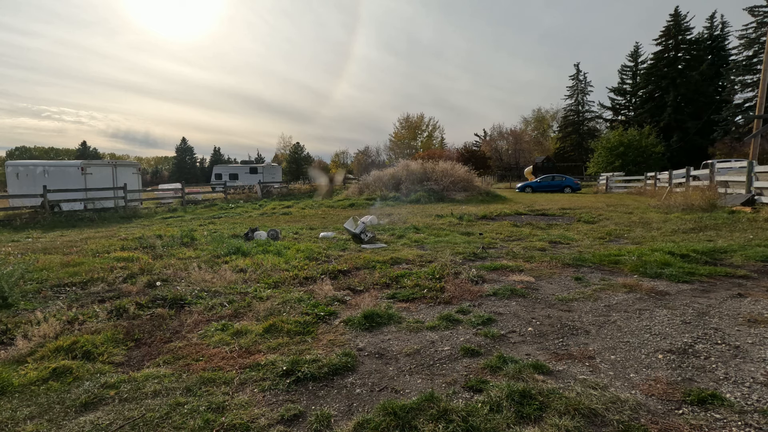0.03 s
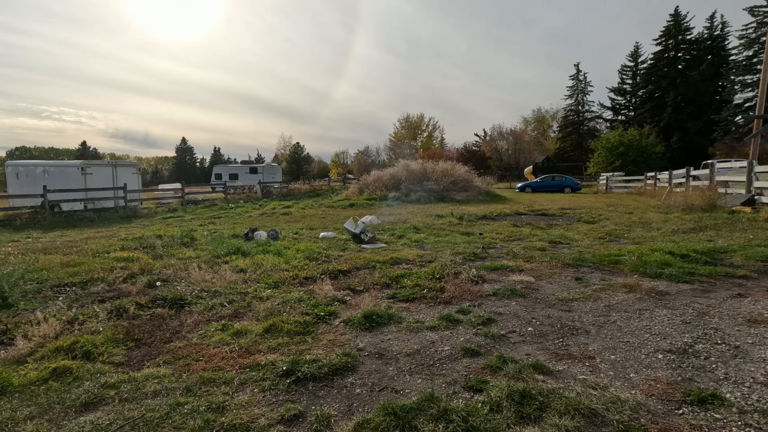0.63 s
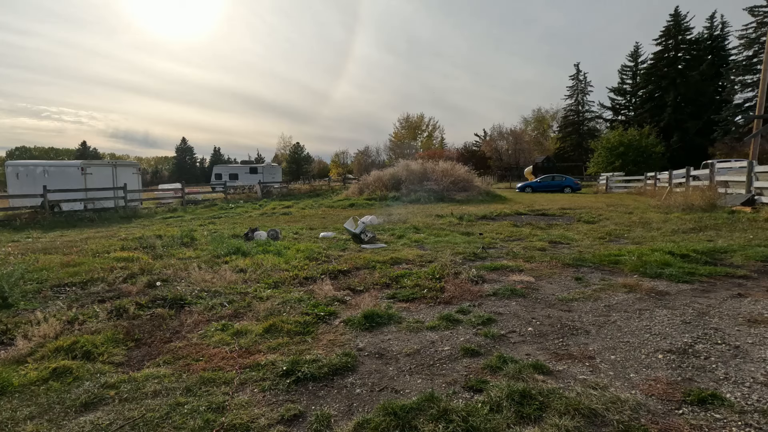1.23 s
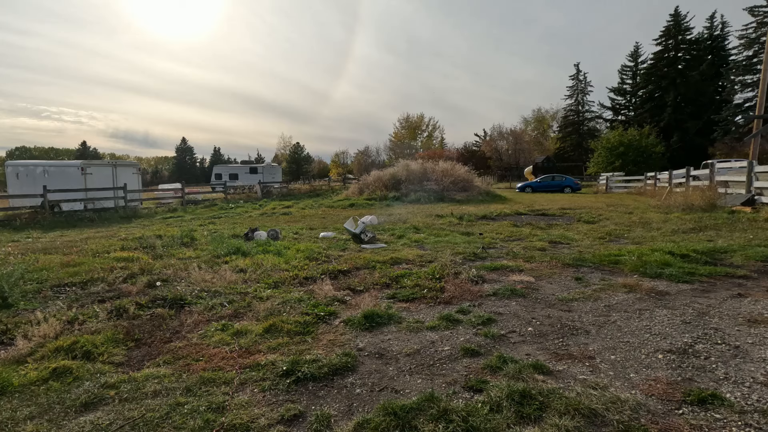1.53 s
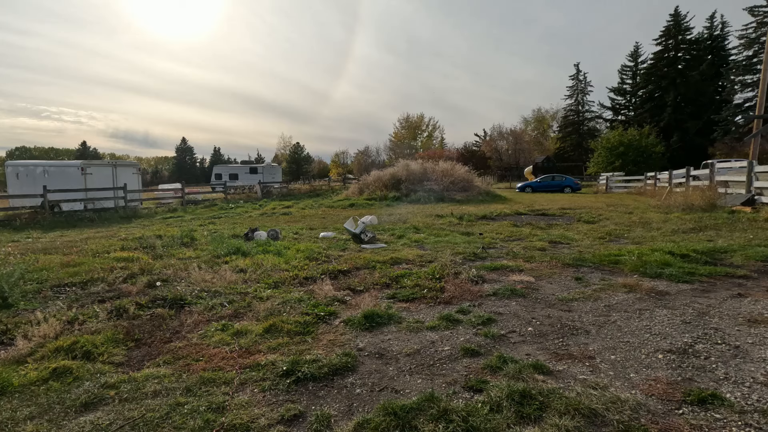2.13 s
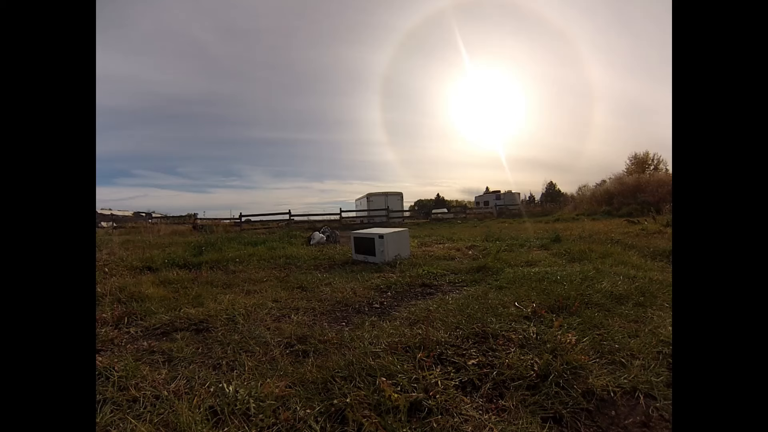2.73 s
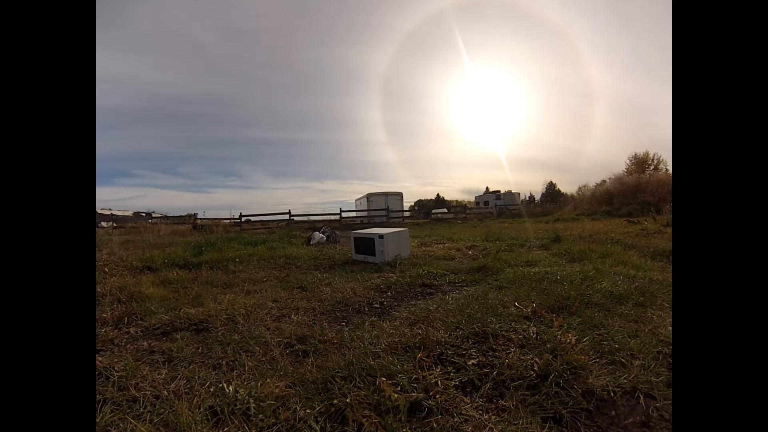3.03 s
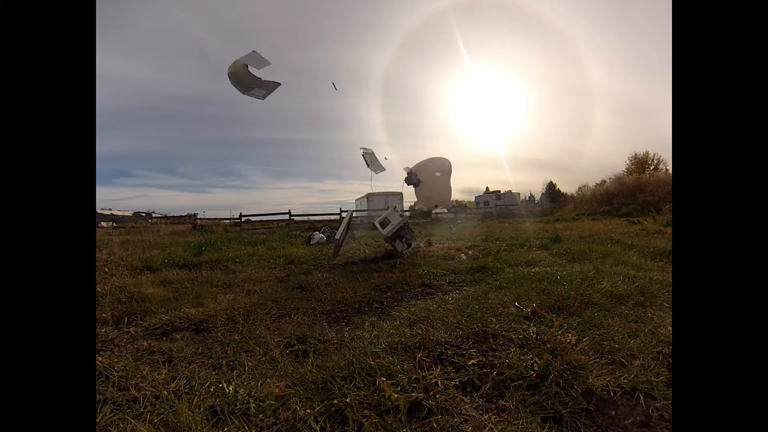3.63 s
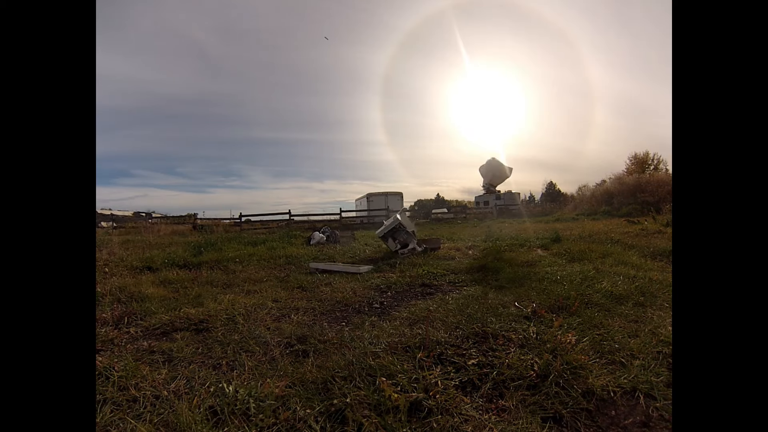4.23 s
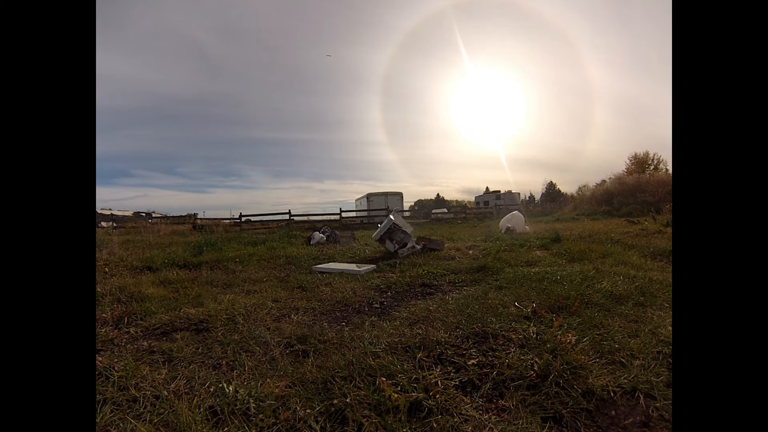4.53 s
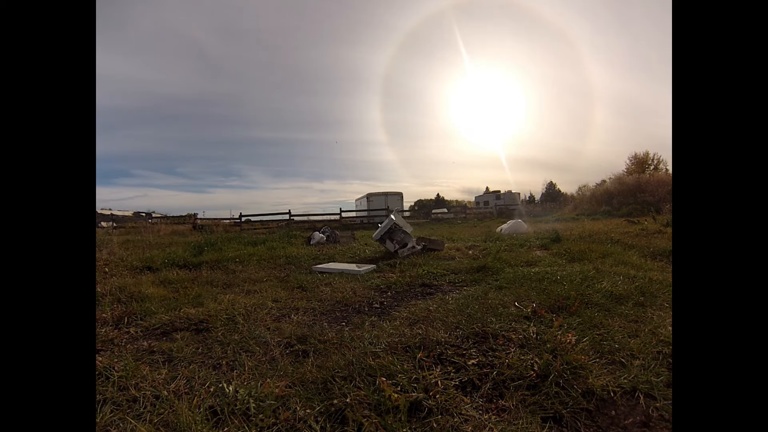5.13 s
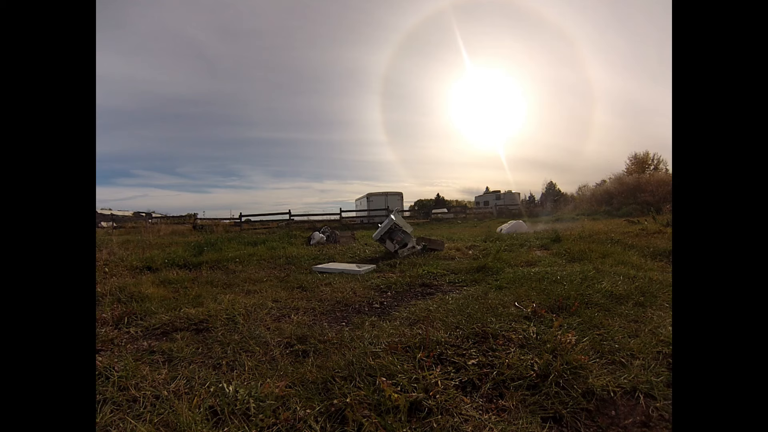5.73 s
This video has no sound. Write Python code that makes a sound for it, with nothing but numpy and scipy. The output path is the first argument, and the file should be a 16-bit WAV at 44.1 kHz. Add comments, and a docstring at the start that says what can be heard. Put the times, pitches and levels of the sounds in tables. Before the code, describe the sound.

Scraps fall after a distant-fading blast, then one sharp explosion blows a microwave oven apart and debris clatters into a field.

```python
"""An open field, two charges. Of the first only echoes and falling scraps are heard, over a rural hush.
Then, from a second spot in a light breeze, a microwave oven is blown apart. The pressure wave overloads
the microphone; sheds and tree lines throw the bang back. Pieces thud, clack and tumble into the grass,
spinning scraps whirr, grit patters, and the steel cover crashes down."""
import sys
import numpy as np
from scipy import signal
from scipy.fft import rfft, irfft, next_fast_len
from scipy.io import wavfile

SR = 44100
rng = np.random.default_rng(int(sys.argv[2]) if len(sys.argv) > 2 else 0)


def generate_wav(signal):
    """Clip the signal to [-1, 1] and save it as 16-bit WAV at the path in sys.argv[1]."""
    frames = np.transpose(np.atleast_2d(signal))
    scaled = np.clip(frames, -1, 1) * 32767
    pcm = np.round(scaled).astype(np.int16)
    wavfile.write(sys.argv[1], SR, pcm)


N = 264159
TIME_S = np.arange(N) / SR
FIRST_BLAST_S, SECOND_SPOT_S, BLAST_S = -0.58, 2.765, 3.5386

# Noise spectra. Each row: frequency in Hz, density in dB.
HUSH_SPECTRUM = [(15, -39.5), (25, -25), (81, -0.5), (278, -10), (326, -12.5), (588, -12), (1280, -17),
                 (2700, -25), (4040, -33.5), (5570, -36), (9020, -56), (10900, -50), (15000, -75.5)]
BREEZE_SPECTRUM = [(12, -31), (20, -3), (42, 2), (72, -2.5), (124, -14.5), (147, -14), (286, -35),
                   (3090, -50), (5090, -52), (5530, -52.5), (7930, -54), (15000, -58)]
FIELD_SPECTRUM = [(47, -42), (80, -3), (267, -9), (450, -7), (700, -11.5), (1350, -20.5), (4310, -18),
                  (8680, -25.5), (15000, -41)]
ECHO_SPECTRUM = [(35, -43), (60, 0.5), (112, 5.5), (236, -6.5), (278, -2), (533, -5.5), (642, -11),
                 (738, -11), (1420, -20), (1700, -20.5), (3270, -25.5), (15500, -48)]
CRASH_SPECTRUM = [(47, -57), (80, -11.5), (263, -5.5), (300, -4), (335, -3.5), (391, 0), (544, -17),
                  (607, -1.5), (1080, -7), (1150, -13), (4220, -12), (15500, -37.5)]
SPLINTER_SPECTRUM = [(35, -43), (60, -9), (179, -1), (486, -9), (559, -5.5), (1260, -11), (1380, -4),
                     (1520, -12.5), (1740, -6), (3760, -12.5), (15500, -30)]
# Envelopes of country hush, far rush and dry grass. Each row: time in seconds, level in dB.
HUSH_ENVELOPE = [(0.88, -57), (.97, -53.5), (1.5, -49), (2.3, -48), (2.7, -48)]
RUSH_ENVELOPE = [(.9, -62), (1.31, -63.5), (1.34, -54), (1.6, -55.5), (2.0, -60), (2.7, -58)]
GRASS_ENVELOPE = [(2.5, -90), (2.65, -61), (2.765, -57)]
# Wind puffs. Each row: peak time in seconds, level in dB, pitch in Hz.
WIND_PUFFS = [(2.832, -36, 42), (2.921, -35.5, 40), (3.127, -35, 47.6), (3.384, -42.5, 42),
              (5.556, -49, 60), (5.682, -30.5, 58.3), (5.913, -40, 38.3)]
# Faint birdlike chirps; short whirring tones, mostly as of spinning scraps, and a faint rising tone just before
# the bang. # Each row: start in seconds, length in seconds, pitch in Hz, final sag in octaves, level in dB,
# waver as a share of the pitch.
FAINT_CHIRPS = [(1.358, 0.04, 1780, -0.06, -50, .035), (2.012, .075, 5560, 0.0255, -65, .011)]
WHIRRING_TONES = [(.372, 0.13, 231, 0.14, -33, .015), (.535, 0.048, 275, -0.021, -43, 0.014),
                  (1.205, 0.049, 460, 0.4, -45, 0.046), (3.42, 0.12, 482, -0.35, -62, .015),
                  (4.365, 0.1, 192, 0.11, -41, .03), (4.55, 0.19, 352, 0.061, -39, 0.041),
                  (4.73, 0.09, 231, 0.1, -37.5, 0.039), (4.86, 0.11, 174, -0.051, -42, 0.041),
                  (5.69, 0.14, 244.3, 0.22, -53.5, .015)]
# Echoes off sheds, fences and trees; small reflectors return no bass.
# Each row: start in seconds, level in dB, t60 in seconds, low edge in Hz.
REFLECTIONS = [(-.02, -24, 0.69, 277), (0.187, -29.5, 0.29, 240), (.222, -24, 0.63, 290),
               (.3, -33, 0.98, 173), (3.672, -29.5, 0.26, 1410), (3.692, -27.5, 0.22, 1500),
               (3.76, -33.5, 0.91, 900), (3.811, -29, 0.61, 50.6), (3.824, -25, 0.86, 720),
               (3.905, -21, 0.34, 570), (3.964, -19.5, 0.27, 400), (4.0, -22, 0.53, 220),
               (4.865, -36.5, 0.74, 212)]
# Grit showers. Each row: start in seconds, level in dB, t60 in seconds.
GRIT_SHOWERS = [(0, -53, 1.7), (3.6, -42.5, 2.5)]
# Steel panel modes. Each row: frequency in Hz, level in dB, t60 in seconds before grass damping.
PANEL_MODES = [(1123, -6.5, 0.67), (1390, -6, 0.37), (1460, -20, 0.52), (1900, -19.5, 0.42),
               (2240, -4.5, 0.39), (2400, -5.5, 0.41), (2700, -20.5, 0.86), (2790, 1.5, 0.38),
               (3070, -12.5, 0.29), (3670, 2.5, 0.24), (3970, -4, 0.41), (4120, 4.5, 0.042),
               (4780, -6.5, 0.42), (4740, -10.5, 0.27), (5367, -23, 0.5), (5860, -18.5, 0.57)]
# Hollow modes of a tumbling panel. Each row: multiple of the lowest mode, level in dB.
HOLLOW_MODES = [(1, 8), (1.43, -9.5), (1.98, -14), (2.601, -18)]
# Tumbling panels. Each row: start in seconds, level in dB, lowest mode in Hz, bend in octaves per second,
# length in seconds, crackle in dB, scuff in dB relative to the ring.
PANEL_TUMBLES = [(.24, -36, 352, -0.5, .1, -61, -3), (3.908, -30, 475.5, 0, 0.046, -46, -2),
                 (3.912, -26.5, 1345, 0.5, 0.019, -41, -6), (3.965, -26.5, 546, 0, 0.029, -48, -2),
                 (4.022, -31.5, 596, 1.5, 0.036, -51.5, 0), (4.216, -32.5, 685, 1, 0.033, -53, -5),
                 (4.214, -39.5, 1487, 1, 0.048, -50, 1.5), (4.325, -27, 805, 0, 0.024, -48.5, -7),
                 (4.424, -41, 1180, 1, 0.023, -52, 2), (4.6, -35.5, 1184, -0.5, 0.027, -54, 1),
                 (4.622, -34.5, 1029, -1.5, 0.04, -47.5, 3), (4.684, -39, 1178, 0, 0.038, -53, -0.5),
                 (4.727, -34, 1076, 2.5, 0.045, -63, -0.5), (4.785, -43.5, 1380, 3, 0.055, -71, -3),
                 (4.85, -48.5, 1259, 0, 0.043, -58, 2), (5.11, -34.5, 620, -1, 0.072, -58, -3.5),
                 (5.555, -49.5, 379.4, -1, .1, -69, 2.5)]
# Hard pieces hitting stones or each other.
# Each row: start in seconds, level in dB, centre in Hz, t60 in seconds.
HARD_KNOCKS = [(-.004, -28.5, 1450, 0.19), (0.011, -32, 4830, 0.036), (.033, -31.5, 1090, .07),
               (.048, -40, 4500, 0.025), (.072, -45, 1200, .04), (0.1022, -19.5, 5040, 0.07),
               (0.1027, -19, 1940, 0.046), (0.108, -32.5, 850, 0.14), (.19, -37.5, 1190, 0.043),
               (.228, -32, 2010, 0.096), (.258, -29.5, 1390, 0.11), (0.2916, -28.5, 3260, 0.087),
               (.375, -63, 6500, 0.041), (0.476, -64, 5860, 0.13), (.505, -52, 3040, 0.23),
               (.562, -63, 6500, 0.034), (0.652, -57, 4500, 0.027), (.916, -54, 3600, 0.22),
               (3.676, -32, 850, 0.087), (3.85, -26.5, 1680, 0.078), (3.892, -36.5, 8000, 0.045),
               (3.912, -35, 6500, 0.15), (3.952, -28, 1800, .03), (3.97, -26, 1300, 0.06),
               (3.971, -32.5, 3500, 0.05), (4.11, -36, 1700, 0.063), (4.124, -32.5, 3400, 0.13),
               (4.125, -48, 9000, 0.072), (4.16, -46, 5000, 0.054), (4.22, -39, 3820, .09),
               (4.3145, -37, 3230, .025), (4.317, -27, 880, 0.068), (4.342, -34, 2400, 0.056),
               (4.347, -46, 6500, .04), (4.403, -48.5, 6000, 0.075), (4.421, -32, 930, 0.12),
               (4.436, -47, 5000, .05), (4.522, -35, 546, 0.24), (4.522, -43, 3800, 0.079),
               (4.608, -39, 2870, 0.26), (4.643, -47.5, 8000, 0.2), (4.73, -40, 2200, 0.06),
               (4.757, -47.5, 7000, 0.08), (4.886, -55.5, 6900, 0.16), (4.983, -38, 3430, 0.1),
               (5.0, -40, 527, 0.98), (5.004, -42, 2920, 0.16), (5.2, -46.5, 8000, 0.56),
               (5.444, -41, 4800, 0.059), (5.518, -53, 3270, 0.067), (5.566, -53.5, 5530, 0.17),
               (5.633, -55, 2810, 0.055)]
# Heavy pieces landing. Each row: start in seconds, level in dB, pitch in Hz, t60 in cycles, rattle in dB.
TURF_LANDINGS = [(0.11, -23, 376, 9, -36), (0.189, -29, 433, 11, -39), (0.291, -19.5, 390, 10, -38.5),
                 (0.7204, -29.5, 315.5, 9.1, -53), (1.397, -34.5, 257, 10, -59),
                 (1.451, -23.5, 281.2, 8.6, -59), (3.84, -15.5, 560, 16.5, -30.5),
                 (3.885, -18, 108, 7, -45), (3.9262, -11, 480, 16, -27), (3.956, -9, 290, 7, -28),
                 (3.9695, -10.5, 520, 21, -30), (4.005, -13, 289, 9.2, -37), (4.027, -15.5, 146, 5, -42),
                 (4.029, -20, 540, 21, -36), (4.1063, -19.5, 630, 12, -38), (4.1575, -16, 354, 6.5, -36),
                 (4.207, -33, 308, 10, -46), (4.319, -13, 184, 12, -34), (4.343, -15, 135, 4.5, -28),
                 (4.36, -16.5, 238, 12, -44), (4.405, -20, 310, 5.9, -45), (4.5195, -9, 336, 7.8, -38),
                 (4.531, -12.5, 209, 10.7, -26.5), (4.529, -16.5, 95, 4.6, -40),
                 (5.035, -25, 476, 20, -40.5), (5.05, -20.5, 131, 5, -41), (5.059, -9, 467, 13.6, -29.5),
                 (5.072, -13, 543, 12, -39), (5.158, -22, 790, 10, -36)]
# The case gives, splits, bursts. Each row: start in seconds, level in dB, centre in Hz, t60 in seconds.
CASE_CRACKS = [(3.5365, -28, 3660, 0.016), (3.542, -15, 4000, 0.025), (3.5448, -4.5, 2500, 0.02)]


def undb(db):
    """Decibels to gain."""
    return 10 ** (np.asarray(db) / 20)


def unit(x):
    """Scale to rms 1."""
    return x / np.sqrt(np.mean(x ** 2))


def add(out, start_s, x):
    """Mix x into out at start_s."""
    i = int(round(start_s * SR))
    x, i = x[max(-i, 0):], max(i, 0)
    out[i:i + len(x)] += x[:N - i]


def span(length_s):
    """Time axis of one event."""
    return np.arange(int(length_s * SR)) / SR


def grains(size, spread_db):
    """Noise in grains of uneven strength; a wide spread crackles."""
    strength = np.repeat(rng.standard_normal(size // 32 + 1), 32)[:size]
    return rng.standard_normal(size) * undb(spread_db * strength)


def colour(x, spectrum, tilt_db_per_oct=0, low_hz=1):
    """Apply a spectrum, tilt and low cut; rms 1."""
    size = next_fast_len(len(x), True)
    bin_hz = np.maximum(np.fft.rfftfreq(size, 1 / SR), 1)
    hz, db = np.transpose(spectrum)
    shape_db = np.interp(np.log(bin_hz), np.log(hz), db) + tilt_db_per_oct * np.log2(bin_hz)
    gain = undb(shape_db) / np.hypot(1, (low_hz / bin_hz) ** 2)
    return unit(irfft(rfft(x, size) * gain, size)[:len(x)])


def swell(t, rise, t60):
    """Linear rise to 1, exponential decay; rise and t60 in the unit of t."""
    return np.clip(t / rise, 0, 1) * np.exp(-np.log(1000) * np.maximum(t - rise, 0) / t60)


def butter(x, edge_hz, kind="low", order=2):
    """Butterworth filter."""
    return signal.sosfilt(signal.butter(order, edge_hz, kind, fs=SR, output="sos"), x)


def band(x, hz, ratio):
    """Band from hz / ratio to hz * ratio; rms 1."""
    return unit(butter(x, [hz / ratio, min(hz * ratio, 0.45 * SR)], "band"))


def convolve(x, response):
    """Convolve with a response scaled to unit energy."""
    return signal.fftconvolve(x, response / np.sqrt(np.sum(response ** 2)))[:len(x)]


def countryside():
    """First spot: wavering hush, far rush, rustling grass."""
    hush_db, rush_db, grass_db = (np.interp(TIME_S, *np.transpose(envelope))
                                  for envelope in (HUSH_ENVELOPE, RUSH_ENVELOPE, GRASS_ENVELOPE))
    hush = colour(grains(N, 0.92), HUSH_SPECTRUM)
    waver_db = 0.54 * band(grains(N, 0), 6.2, 2.6)
    rush = band(grains(N, 1), 1000, 1.75)
    grass = band(grains(N, 4), 2500, 1.63)
    return hush * undb(hush_db + waver_db) + rush * undb(rush_db) + grass * undb(grass_db)


def breeze(puff_width_s=0.0097, turbulence=0.3):
    """Second spot: wind rumble and hiss; each eddy briefly shoves the microphone."""
    air = colour(grains(N, 0), BREEZE_SPECTRUM)
    rumble = butter(air, 190)
    hiss = unit(butter(air, 240, "high", order=4))
    out = undb(-48) * rumble + undb(-62.5) * hiss
    for peak_s, db, hz in WIND_PUFFS:
        t = TIME_S - peak_s
        eddy = np.sin(2 * np.pi * hz * t) + turbulence * rumble
        out += undb(db) * eddy * np.exp(-(t / puff_width_s) ** 2)
    return out


def tones(rows, hold_share=0.46):
    """Whirrs or chirps: wavering tones that swell and fade; the pitch holds, then glides."""
    out = np.zeros(N)
    for start_s, length_s, hz, sag_oct, db, waver_share in rows:
        progress = span(length_s) / length_s
        waver = 1 + waver_share * band(grains(SR, 0), 40, 2.5)[-len(progress):]
        pitch_hz = hz * 2 ** (-sag_oct * np.interp(progress, [hold_share, 1], [0, 1])) * waver
        tone = np.sqrt(2) * np.sin(2 * np.pi * np.cumsum(pitch_hz) / SR)
        add(out, start_s, undb(db) * np.sin(np.pi * progress) * tone)
    return out


def field_tail(x):
    """Grass and far trees return a thin, dull tail."""
    t = span(1.5)
    tail = colour(grains(len(t), 3.6), FIELD_SPECTRUM, low_hz=110) * swell(t, 0.16, 0.9)
    return undb(-29.5) * convolve(x, tail)


def echo(start_s, db, rise_s, t60_s, low_hz):
    """A reflector scatters the bang into many small arrivals; the longer the path, the duller."""
    t = span(2 if t60_s > 1 else 1)
    cloud = colour(grains(len(t), 3), ECHO_SPECTRUM, -0.44, low_hz)
    lag_samples = int(SR * rng.uniform(0.002, 0.006))
    hollow = cloud + 0.5 * np.roll(cloud, lag_samples)  # second, slightly longer path
    delay_s = start_s - (BLAST_S if start_s > SECOND_SPOT_S else FIRST_BLAST_S)
    air_cutoff_hz = min(3330 / delay_s, 9300)
    return undb(db) * unit(butter(hollow, air_cutoff_hz)) * swell(t, rise_s, t60_s)


def echoes(rise_share=0.028):
    """Single reflectors answer over the long roll of the tree line."""
    out, roll_s = np.zeros(N), BLAST_S + 0.52
    add(out, roll_s, echo(roll_s, db=-31, rise_s=0.24, t60_s=3.23, low_hz=169))
    for start_s, db, t60_s, low_hz in REFLECTIONS:
        rise_s = rise_share * t60_s  # a deep reflector builds and fades slowly
        add(out, start_s, echo(start_s, db, rise_s, t60_s, low_hz))
    return out


def grit():
    """Chips and soil tick down after each blast; grass smears each tick."""
    out, t = np.zeros(N), span(1.6)
    smear = swell(span(0.03), 0.0004, 0.025)
    for start_s, db, t60_s in GRIT_SHOWERS:
        ticks = signal.fftconvolve(np.abs(grains(len(t), 8.5)), smear)[:len(t)]
        patter = band(ticks * grains(len(t), 0), 3000, 2.4)
        add(out, start_s, undb(db) * patter * swell(t, 0.01, t60_s))
    return out


def panel_ring(blow, t60_share=0.18):
    """A blow rings bent steel, each piece tuned differently; grass shortens the ring."""
    t = span(0.105)
    detunes = 1 + 0.032 * rng.standard_normal(len(PANEL_MODES))
    ring = sum(undb(db) * np.sin(2 * np.pi * hz * detune * t) * swell(t, 1 / SR, t60_share * t60_s)
               for (hz, db, t60_s), detune in zip(PANEL_MODES, detunes))
    return convolve(blow, ring)


def tumble(db, hz, bend_oct_per_s, length_s, crackle_db, scuff_db):
    """A panel scuffs along and rings hollow, its pitch bending as it flexes; dry stalks crackle."""
    rise_s, t60_s, mode_width_hz = 0.009, 0.1, 130
    t = span(0.42)
    cycles = np.cumsum(hz * 2 ** (bend_oct_per_s * t)) / SR
    ring = 0
    for multiple, mode_db in HOLLOW_MODES:
        drive = butter(grains(len(t), 0) + 1j * grains(len(t), 0), mode_width_hz)
        ring += undb(mode_db) * np.real(drive * np.exp(2j * np.pi * multiple * cycles))
    scuff = undb(scuff_db) * band(grains(len(t), 3), hz, 1.86)
    crackle = undb(crackle_db) * band(grains(len(t), 2.7), 4800, 2.6)
    contact = np.minimum(t / rise_s, 1) * undb(-60 * np.maximum(t - length_s, 0) / t60_s)
    return (undb(db) * (unit(ring) + scuff) + crackle) * contact


def clack(db, hz, t60_s):
    """A hard piece snaps on contact, then rattles and rings a little."""
    t = span(0.29)
    snap = undb(-5.5) * swell(t, 0.0006, 0.0084)
    rattle = band(grains(len(t), 2.6), hz, 1.585) * (snap + swell(t, 0.0011, t60_s))
    ring = panel_ring(rattle * swell(t, 1 / SR, 0.29))  # driven mainly by first contact
    return undb(db) * (rattle + undb(-13) * ring)


def thud(db, hz, t60_cycles, rattle_db, rise_cycles=0.87):
    """A piece thuds into turf and shakes; bigger pieces rattle lower and longer."""
    rattle = clack(rattle_db, 1.73 * hz, t60_s=0.15 * np.sqrt(400 / hz))
    cycles = hz * np.arange(len(rattle)) / SR
    turf = 0.25 * band(grains(len(cycles), 0), hz, 1.7)
    body = np.sin(2 * np.pi * cycles) + turf
    return undb(db) * body * swell(cycles, rise_cycles, t60_cycles) + rattle


def debris():
    """Heavy pieces thud, hard ones clack, panels tumble."""
    out = np.zeros(N)
    for table, sound in ((TURF_LANDINGS, thud), (HARD_KNOCKS, clack), (PANEL_TUMBLES, tumble)):
        for start_s, *piece in table:
            add(out, start_s, sound(*piece))
    return out


def cover(landing_s=5.059):
    """The steel cover lands: the ground thumps; the sheet booms, buckles and wobbles to rest."""
    out, t = np.zeros(N), span(0.78)
    thump = undb(-24) * band(grains(len(t), 0), 77, 2.1) * swell(t, 0.0037, 0.084)
    boom = undb(-21) * band(grains(len(t), 0.96), 520, 1.22) * swell(t, 0.0034, 0.18)
    buckling = undb(-22) * swell(t, 0.012, 0.13) + undb(-21) * swell(t, 0.021, 0.55)
    crash = colour(grains(len(t), 1.7), CRASH_SPECTRUM) * buckling
    wobble = undb(-38.5) * band(grains(len(t), 2.2), 372, 1.79) * swell(t, 0.25, 0.7)
    add(out, landing_s, thump + boom + crash + wobble)
    return out


def blast(push_s=0.0061):
    """Pressure wave and rebound, cracks of the bursting case, a spray of splinters."""
    out, t = np.zeros(N), span(0.43)
    push = -0.95 * swell(t, 0.0006, 0.065) * (t < push_s)
    rebound = 1.25 * swell(t - push_s, 0.0003, 0.024)
    add(out, BLAST_S, push + rebound)
    for start_s, db, hz, t60_s in CASE_CRACKS:
        add(out, start_s, undb(db) * band(grains(len(t), 1), hz, 1.96) * swell(t, 0.0003, t60_s))
    splinters = colour(grains(len(t), 2.5), SPLINTER_SPECTRUM) * swell(t, 0.01, 0.26)
    add(out, BLAST_S + push_s, undb(-16.5) * splinters)
    return out


def scene():
    """Two spots in turn, one microphone each; the channels differ only by faint hiss."""
    dip_s, dip_width_s, dip_db = 5.5, 0.0097, -12  # the level dips briefly
    dip = undb(dip_db * np.exp(-((TIME_S - dip_s) / dip_width_s) ** 2))
    strikes = blast() + debris() + cover() + grit()
    events = (strikes + field_tail(strikes) + echoes() + tones(WHIRRING_TONES) + tones(FAINT_CHIRPS)) * dip
    first_spot = butter(events, [160, 8800], "band", order=4) + countryside()  # narrow-band microphone
    second_spot = events + breeze()
    mono = np.where(TIME_S < SECOND_SPOT_S, first_spot, second_spot)
    self_noise = undb(-83) * band(grains(N, 0), 5000, 3) * (TIME_S >= SECOND_SPOT_S)
    return np.array([mono + self_noise, mono - self_noise])


def record(dry):
    """The pressure wave clips the input; a steep low-pass cuts the top."""
    ceiling, top_hz = 0.93, 15700
    lowpass = signal.ellip(10, 0.1, 80, top_hz, fs=SR, output="sos")
    return signal.sosfilt(lowpass, np.clip(dry, -ceiling, ceiling))


dry = scene()
out = record(dry)
generate_wav(out)
```